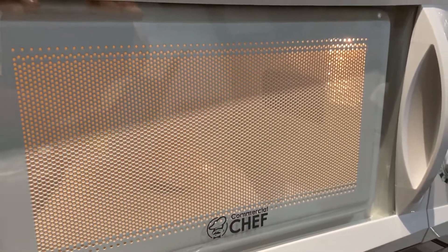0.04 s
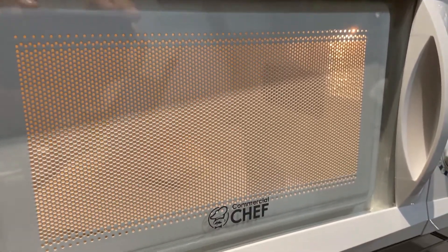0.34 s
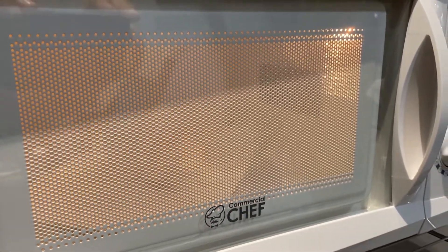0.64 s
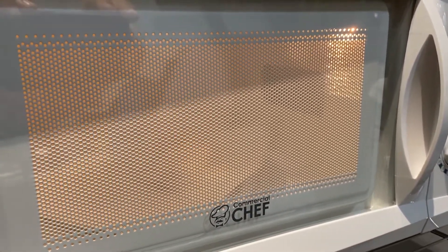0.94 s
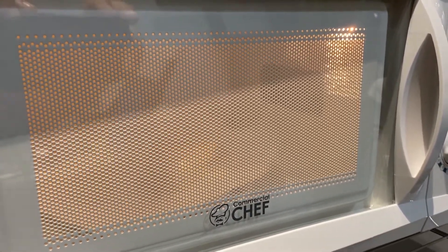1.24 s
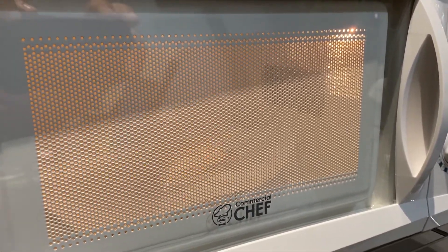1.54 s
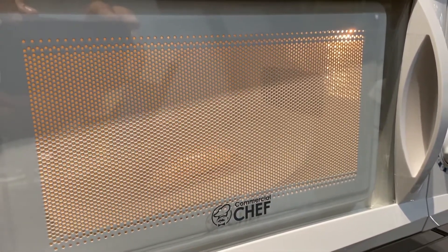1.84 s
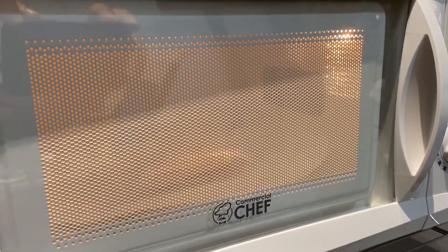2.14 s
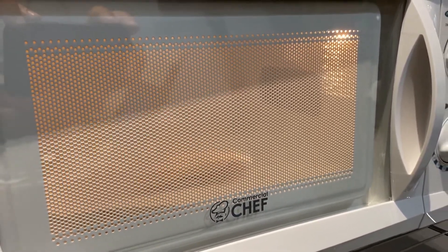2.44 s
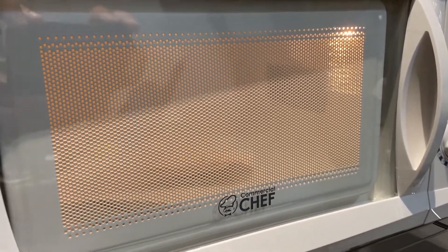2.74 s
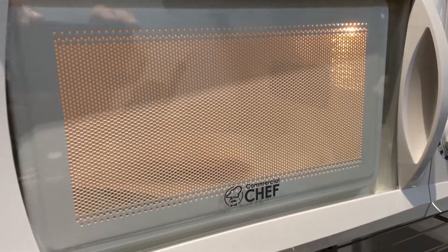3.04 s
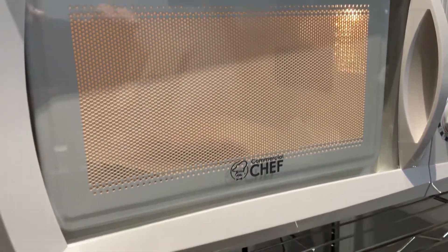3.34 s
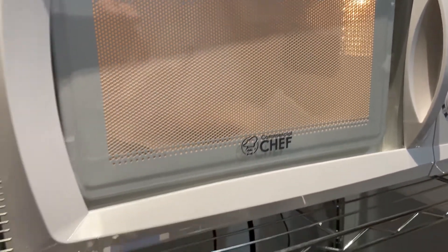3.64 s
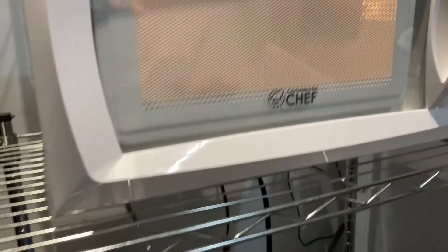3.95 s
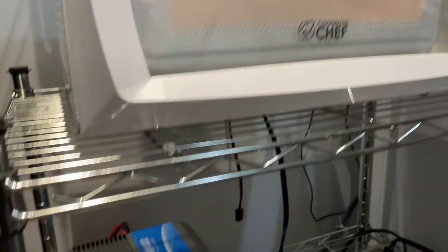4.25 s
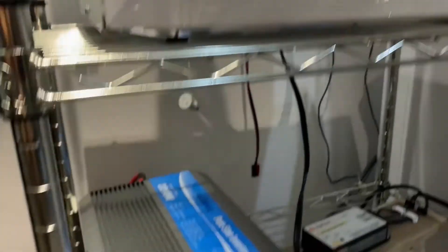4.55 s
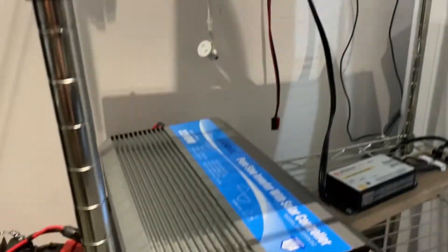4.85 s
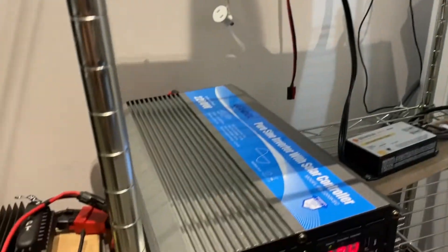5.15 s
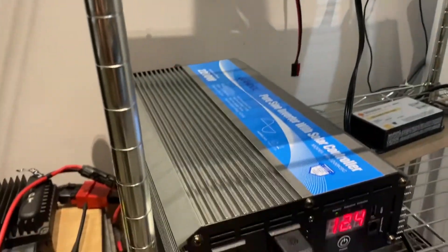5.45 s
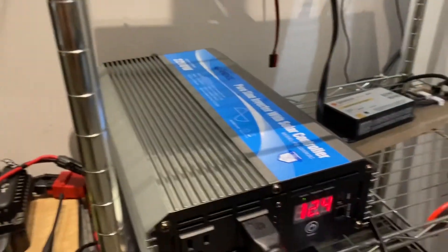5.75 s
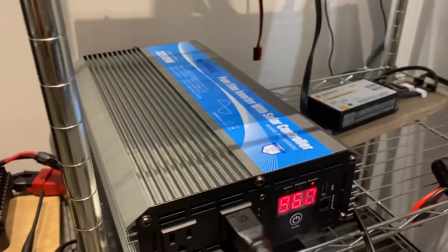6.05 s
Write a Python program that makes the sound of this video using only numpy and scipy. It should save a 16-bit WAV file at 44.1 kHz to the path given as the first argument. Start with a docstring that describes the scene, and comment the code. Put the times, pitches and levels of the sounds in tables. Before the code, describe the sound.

Heard from right at its door, a microwave oven hums and whirs in a room, its cavity droning over a soft rumble and a thin whine. About two thirds of the way through, the microphone moves down past the oven's edge with a slight hiss, and the cooling fan of a power inverter swells into a broader rush with a mid-pitched note. The low hum and a faint high whistle continue throughout.

```python
"""On a wire shelf a small microwave oven runs: its transformer hums, its fan whirs through the steel
case and makes the cooking cavity drone, with a low rumble and a motor whine. After four seconds the
microphone sinks to the shelf below, where the power inverter that feeds the oven stands. There the air
rushes more broadly and a fan note comes forward. A thin electronic whistle hangs over it all."""
import sys
import numpy as np
from scipy.fft import rfft, irfft, next_fast_len
from scipy.io import wavfile
from scipy.ndimage import uniform_filter1d, map_coordinates

SR = 44100
rng = np.random.default_rng(int(sys.argv[2]) if len(sys.argv) > 2 else 0)


def wrap_up_sound(samples):
    """Save the sound to the file named by the first command line argument, as 16-bit audio."""
    columns = np.atleast_2d(samples).T
    # keep every value between -1 and 1, then stretch to whole-number steps
    tamed = np.clip(columns, -1, 1)
    steps = np.round(tamed * 32767).astype(np.int16)
    wavfile.write(sys.argv[1], SR, steps)


N = 268172

# where the microphone is: time_s, place (0 at the oven door, 1 on the lower shelf)
MIC_PATH = [(0, 0.068), (1.6, 0.068), (3.1, 0.012), (3.7, 0.18), (4.2, 0.29), (4.6, 0.7), (5.3, 1),
            (6.08, 0.88)]
# transformer hum: mains_multiple, door_db, shelf_db, left_minus_right_db
HUM_NOTES = [(1, -47.5, -43, -.5), (2, -32.5, -32, -1.3), (3, -56.5, -64, 9), (4, -41, -47.5, -3),
             (5, -56, -50, -5)]
# tone colour of the air at the door, on the lower shelf and at the oven's edge: pitch_hz, relative_db
DOOR_AIR = [(60, -22), (130, 1), (180, -4), (320, 0), (480, -1.5), (620, -2.5), (1000, -5.5), (1900, -9.5),
            (2600, -15), (3200, -20.5), (4900, -22), (5800, -27.5), (6600, -30), (7600, -33.5)]
SHELF_AIR = [(60, -9), (150, -6), (220, 1), (380, -1.5), (620, -1.5), (950, -5), (1380, -9), (1900, -12),
             (2700, -14), (3300, -16), (4600, -20.5), (6200, -23), (7600, -24.5)]
EDGE_HISS = [(700, -11), (1500, 0), (2500, -15), (5000, -4), (7600, -15)]
# how all air noise fades in the high treble: pitch_hz, gain_db
AIR_TREBLE = [(7700, 0), (8500, -9.5), (10000, -8.7), (12200, -8.7), (13000, -25), (16000, -45)]
# pitches at which the air rings in the case and under it: pitch_hz, width_hz, lift_db
CASE_RESONANCES = [(344, 25, 4.5), (367, 17, -2), (554, 49, 5.5), (703, 30, 3), (787, 44, 9.5),
                   (836, 31, 8), (990, 30, -3), (960, 24, 2), (1101, 25, 6.5), (1176, 88, 6), (1277, 48, 4),
                   (1550, 127, 5), (1727, 47, 6.5), (2140, 170, -2), (2530, 63, 0), (2695, 90, 3.5),
                   (4100, 270, 4), (4620, 94, 6), (4800, 220, 4)]
UNDER_RESONANCES = [(404, 37, 8.5), (622, 34, -6), (1163, 59, 4.5), (1560, 110, 3), (1906, 250, 5.5),
                    (2540, 220, 2.5), (2900, 180, 2.5), (3770, 250, -2), (4440, 200, 4), (5490, 140, 3.5)]
# air noise in the two ears: pitch_hz, likeness (0 to 1), left_minus_right_db, left_lead_radians
DOOR_STEREO = [(131, 0.4, -10, -0.013), (288, 0.9, -2, -0.071), (408, 0.83, -1.5, -0.44),
               (627, 0, 0.5, -0.19), (840, 0.85, 0.5, -1.45), (1070, 0.27, 4, 0.075),
               (1380, 0.18, 2, -1.33), (1870, 0.68, 1, -0.72), (3080, 0.56, 4.5, -0.49),
               (4730, 0.56, 4.5, -0.31), (7300, 0.8, -0.5, -0.14), (8700, 0, -0.5, -3)]
SHELF_STEREO = [(129, 0.84, 6, 0.8), (290, 0.95, -3.5, 0.2), (430, 0.77, 2.5, 0.47),
                (610, 0.38, 12.5, 0.76), (850, 0.99, 2.5, 0.24), (1070, 0.5, 2, -0.2),
                (1510, 0.24, 2.5, -2), (1950, 0.67, 1.5, -1.2), (3100, 0.76, 3, -1.2),
                (5370, 0.55, 3.5, 1.3), (6700, 1, 1, 1.4), (8350, 0.13, 0, -0.8)]
# notes of the fans and motors: pitch_hz, door_db, shelf_db, left_minus_right_db
MOTOR_NOTES = [(135.9, -52, -62, 1), (212, -58, -54, 6), (270.5, -55, -51.5, -5), (355.3, -60, -51, 1),
               (402, -51, -47.5, 5), (496.6, -54, -48.5, 8), (644.7, -59, -57, 1), (664.8, -58.5, -42.5, 1),
               (798.1, -62, -53, 1), (1093, -61, -66, 4), (1290.6, -62, -69, 6), (1843, -66, -70, 2),
               (2212.5, -62, -67, 5), (2467, -68, -68, 4), (2656.7, -68, -68, 3)]
# resonances of the oven's cavity: pitch_hz, width_hz, gain_db, drop_at_shelf_db
CAVITY_RESONANCES = [(403.5, 22, -4.5, 2.5), (430, 22.7, -3.5, 18.5), (458.8, 27, -4.5, 23)]
# rise and fall of the cavity's drone: time_s, gain_db
DRONE_GAIN = [(0, -35.5), (.45, -32), (.85, -33), (1.05, -36), (2.1, -33.5), (2.45, -35), (3.2, -32.5),
              (3.7, -35.5), (4.2, -33), (4.4, -52), (6.08, -52)]
# tone colour of the rumble: pitch_hz, relative_db
RUMBLE_COLOUR = [(15, -48), (26, -31), (35, -15), (46, -5), (60, 9), (74, 2), (88, 2), (105, -7),
                 (150, -19), (300, -89)]
# loudness of the rumble: time_s, level_db
RUMBLE_LEVEL = [(0, -37), (.45, -34), (1, -36.5), (1.35, -32.5), (2, -36), (3.5, -36.5), (4.1, -36.5),
                (5.2, -35), (5.75, -40), (6.08, -36)]
# loudness of the whistle before its dips: time_s, level_db
WHISTLE_LEVEL = [(0, -63), (0.75, -52.5), (1.2, -58), (2.15, -62), (2.45, -57), (2.7, -70), (2.95, -72),
                 (3.15, -61), (3.5, -61), (3.85, -62), (3.98, -50.5), (4.75, -54), (4.95, -59),
                 (5.25, -55.5), (6.08, -59)]
# quiet spots in the whistle's standing waves, as the microphone crosses them: time_s, depth_db
QUIET_SPOTS = [(3.62, 7), (3.88, 16), (4.08, 5), (4.26, 12), (4.34, 17), (4.62, 16), (5.08, 8)]
# tone colour of the inverter's fan: pitch_hz, relative_db
INVERTER_AIR = [(300, -30), (450, -1.5), (540, 2), (620, -5.5), (820, -2), (950, -9), (1300, -33)]
# resonances of the inverter's housing: pitch_hz, width_hz, lift_db
HOUSING_RESONANCES = [(484, 75, 9.2), (680, 52, 5), (745, 28, 4.9), (802, 33, 9.3)]
# loudness of the inverter's fan: time_s, level_db
INVERTER_LEVEL = [(0, -51), (3.6, -51), (4.3, -39.5), (4.8, -34.5), (5.3, -33.5), (6.08, -35.5)]


def amp(db):
    """Turn decibels into a number to multiply by."""
    return 10 ** (np.asarray(db) / 20)


def unit(x):
    """Scale a sound to an average strength (rms) of 1."""
    return x / np.sqrt(np.mean(x ** 2) + 1e-20)


def along(points, hz):
    """Read between (pitch_hz, value) rows, on a logarithmic pitch scale."""
    pitches, values = np.transpose(points)
    return np.interp(np.log(hz + 1), np.log(pitches + 1), values)


def curve(rows):
    """Join (time_s, value) rows with straight lines, one value per sample."""
    return np.interp(np.arange(N) / SR, *np.transpose(rows))


def bump(x, middle, reach):
    """A smooth hill: 1 at the middle, about a third at one reach to either side."""
    return np.exp(-((x - middle) / reach) ** 2)


def wobble(rate_hz):
    """A smooth curve through rate_hz random values a second."""
    values = rng.standard_normal(int(N * rate_hz / SR) + 4)
    return map_coordinates(values, [np.arange(N) * rate_hz / SR])


def filtered(x, response):
    """Turn each frequency up or down by the gain response(hz)."""
    size = next_fast_len(N + SR // 2)
    return irfft(rfft(x, size) * response(np.fft.rfftfreq(size, 1 / SR)), size)[..., :N]


def pan(tilt_db):
    """Left and right gains that make the left louder by tilt_db."""
    return amp(np.array([[.5], [-.5]]) * tilt_db)


def tone(hz, drift_radians):
    """A pure note of strength 1 whose phase wanders a little."""
    phase = 2 * np.pi * (hz * np.arange(N) / SR + rng.random())
    return np.sqrt(2) * np.sin(phase + drift_radians * wobble(4.02))


def rush(colour, resonances, stereo):
    """Stereo air noise of strength 1, shaped by the resonances of the space it blows through."""
    size = next_fast_len(N + SR // 2)
    hz = np.fft.rfftfreq(size, 1 / SR)
    lift_db = sum(db * 2 ** -np.minimum((2 * (hz - centre) / width) ** 2, 100)
                  for centre, width, db in resonances)
    gain = amp(along(colour, hz) + along(AIR_TREBLE, hz) + lift_db)
    pitches, *columns = np.transpose(stereo)
    likeness, tilt_db, lead = (along(np.column_stack([pitches, column]), hz) for column in columns)
    # both ears share the mid noise; the side noise makes them differ
    angle = np.arccos(np.clip(likeness, -1, 1)) / 2
    noise = rfft(rng.standard_normal((2, N)), size)
    mid, side = noise * gain * np.array([np.cos(angle), np.sin(angle)])
    # the sound reaches left and right at different strengths and phases
    ears = pan(tilt_db) * np.exp(1j * np.array([[.5], [-.5]]) * lead)
    return unit(irfft(np.array([mid + side, mid - side]) * ears, size)[:, :N])


def transformer_hum(place, mains_hz=59.92):
    """The core flexes twice per mains cycle; the mix of overtones depends on where one listens."""
    hum = 0
    for multiple, door_db, shelf_db, tilt_db in HUM_NOTES:
        level_db = door_db + (shelf_db - door_db) * place + .25 * wobble(5.5)
        hum += amp(level_db) * tone(multiple * mains_hz, drift_radians=.024) * pan(tilt_db)
    return hum


def oven_fan(place):
    """The whir at the door gives way to a broader rush below, with a bright hiss at the edge between."""
    door = amp(-34) * rush(DOOR_AIR, CASE_RESONANCES, DOOR_STEREO)
    shelf = amp(-32.5) * rush(SHELF_AIR, UNDER_RESONANCES, SHELF_STEREO)
    edge = amp(-47.5) * bump(place, middle=.51, reach=.34) * rush(EDGE_HISS, [], DOOR_STEREO)
    unsteady_flow = amp(.12 * wobble(4.46))
    return unsteady_flow * ((1 - place) ** .61 * door + place ** .62 * shelf + edge)


def motor_notes(place):
    """Fans and motors sing slightly unsteady notes, each with its own strength at the door and below."""
    notes = 0
    for hz, door_db, shelf_db, tilt_db in MOTOR_NOTES:
        level_db = door_db + (shelf_db - door_db) * place + 2 * wobble(5)
        notes += amp(level_db) * tone(hz, drift_radians=.4) * pan(tilt_db)
    return notes


def cavity_drone(place, smoothing_s=.06, evenness=.3):
    """The fan's air sounds three close resonances, which throb; the lowest fades least on the way down."""
    peak_shape = [(-2, -45), (-.5, -3), (0, 0), (.5, -3), (2, -45)]  # widths_from_centre, relative_db
    at_door = drone = 0
    for hz, width_hz, gain_db, drop_db in CAVITY_RESONANCES:
        colour = [(hz + offset * width_hz, db) for offset, db in peak_shape]
        band = amp(gain_db) * rush(colour, [], DOOR_STEREO)
        at_door += band
        drone += band * amp(-drop_db * place)
    # partly even out the throbbing: turn loud moments down and quiet ones up
    power = np.mean(unit(at_door) ** 2, axis=0)
    smooth_power = np.abs(uniform_filter1d(power, round(smoothing_s * SR))) + 1e-6
    return amp(curve(DRONE_GAIN)) * drone / np.sqrt(smooth_power) ** evenness


def rumble(side_db=-20):
    """A low fluttering rumble, nearly alike in both ears."""
    noise = rng.standard_normal((2, N))
    mid, side = unit(filtered(noise, lambda hz: amp(along(RUMBLE_COLOUR, hz))))
    return amp(curve(RUMBLE_LEVEL)) * (mid + amp(side_db) * np.array([side, -side]))


def motor_whine(place, pitch_hz=2277.3, door_db=-50, shelf_db=-60):
    """A motor whines, loudest at the door; the oven's bottom edge blocks it briefly on the way down."""
    blocked_db = 22 * bump(place, middle=.36, reach=.19)
    level_db = door_db + (shelf_db - door_db) * place - blocked_db + .36 * wobble(4.5)
    return amp(level_db) * tone(pitch_hz, drift_radians=.29) * pan(tilt_db=7.3)


def electronic_whistle(pitch_hz=15046, dip_s=.03):
    """Switching electronics whistle in standing waves; the level dips at each quiet spot crossed."""
    t = np.arange(N) / SR
    dips_db = sum(depth_db * np.exp(-np.abs(t - time_s) / dip_s) for time_s, depth_db in QUIET_SPOTS)
    flutter_db = .8 * wobble(70)
    return amp(curve(WHISTLE_LEVEL) - dips_db + flutter_db) * tone(pitch_hz, drift_radians=.6)


def inverter_fan():
    """The inverter's fan blows through its housing and swells as the microphone comes close."""
    return amp(curve(INVERTER_LEVEL)) * rush(INVERTER_AIR, HOUSING_RESONANCES, SHELF_STEREO)


def hollowed(sound, place, pitch_hz=655, reach_hz=55, depth=.65):
    """A band of middle pitches thins out as the microphone passes the foot of the door."""
    band = filtered(sound, lambda hz: bump(hz, pitch_hz, reach_hz))
    return sound - depth * bump(place, middle=.2, reach=.1) * band


def scene():
    """All the sounds together, as heard along the microphone's path."""
    place = curve(MIC_PATH)
    fans = hollowed(oven_fan(place) + inverter_fan() + motor_notes(place), place)
    low_sounds = cavity_drone(place) + rumble() + transformer_hum(place)
    return fans + low_sounds + motor_whine(place) + electronic_whistle()


def record(dry):
    """Cut away the very highest treble."""
    top_hz = 15569
    return filtered(dry, lambda hz: hz < top_hz)


dry = scene()
out = record(dry)
wrap_up_sound(out)
```